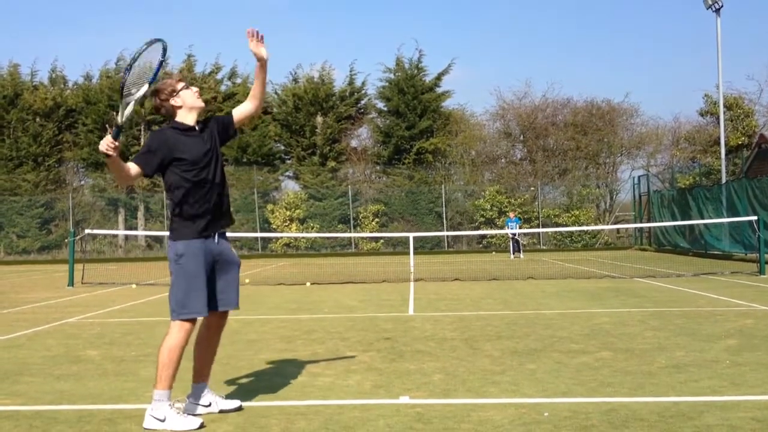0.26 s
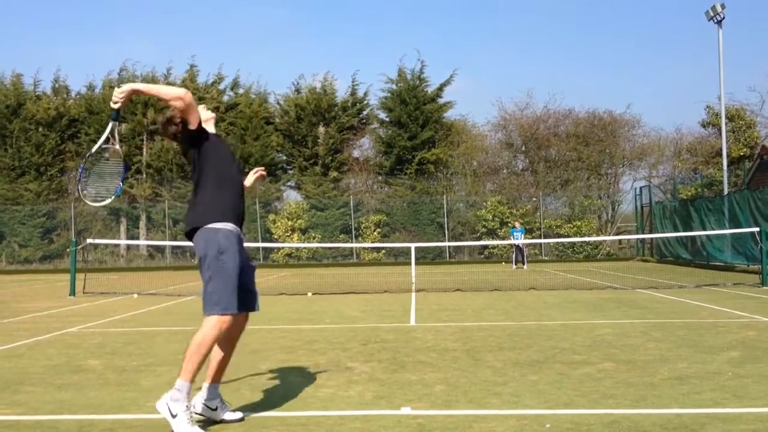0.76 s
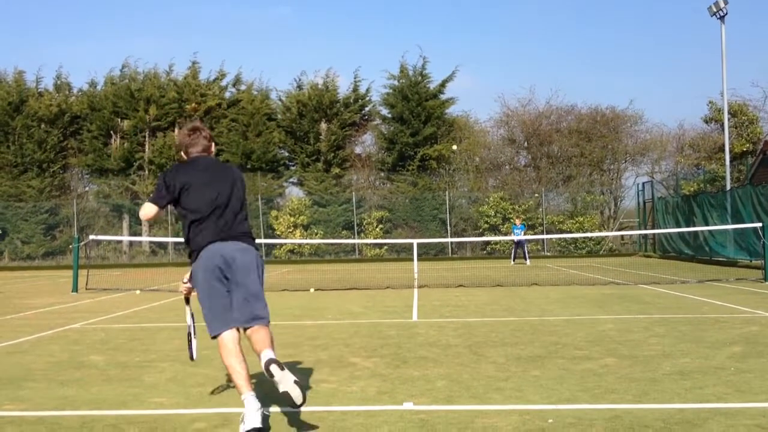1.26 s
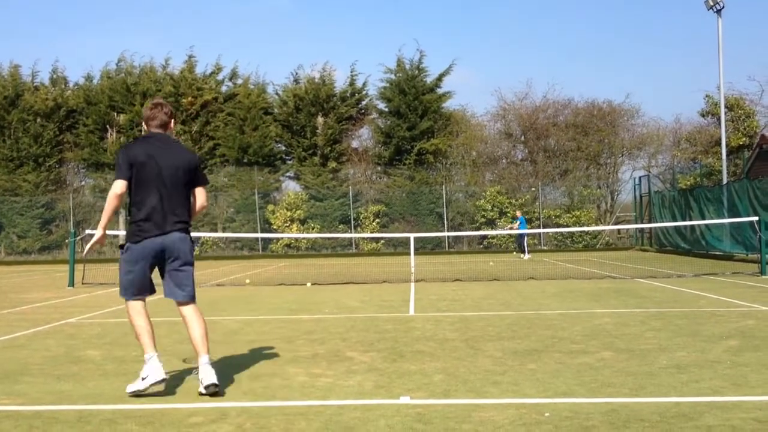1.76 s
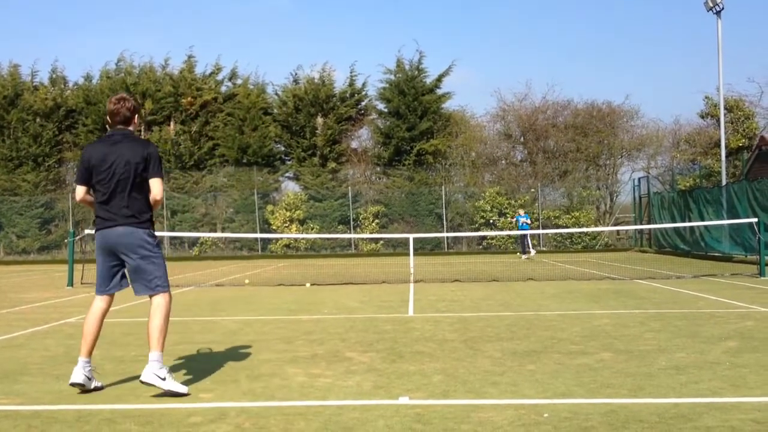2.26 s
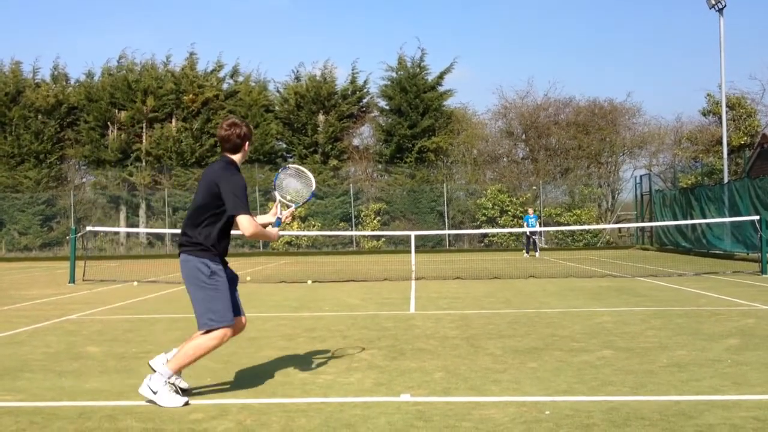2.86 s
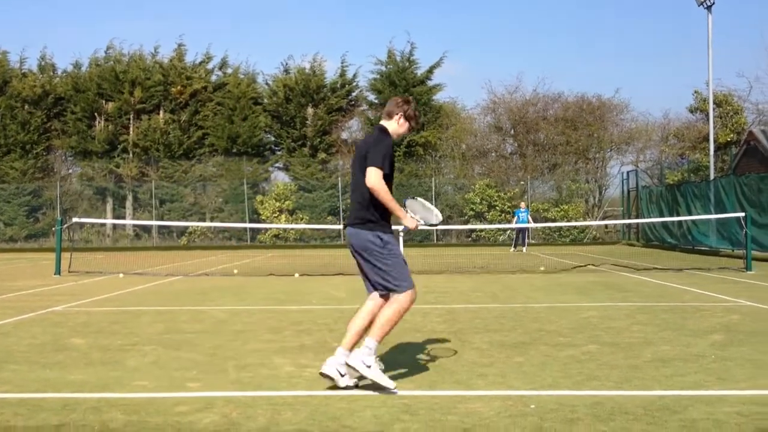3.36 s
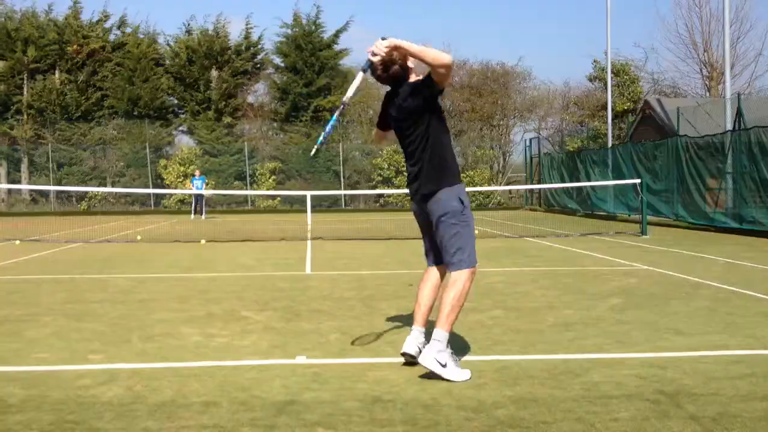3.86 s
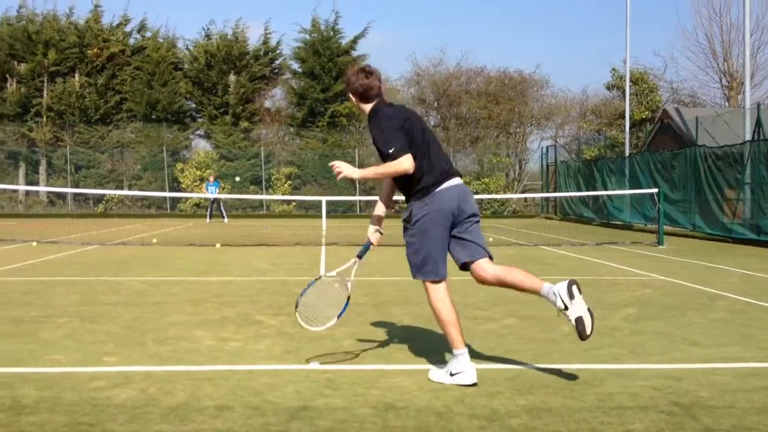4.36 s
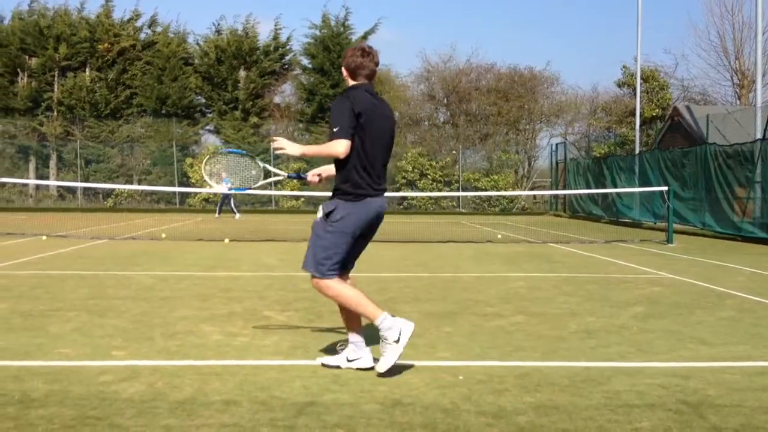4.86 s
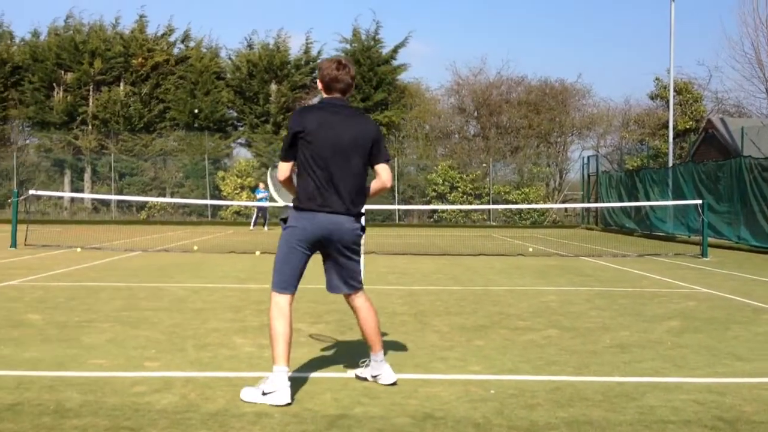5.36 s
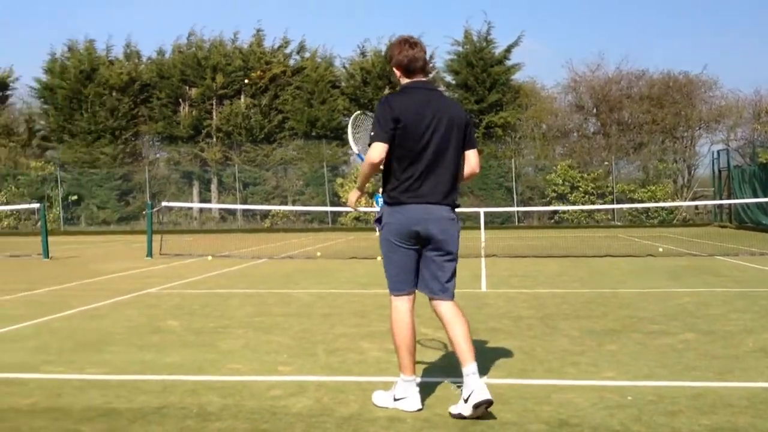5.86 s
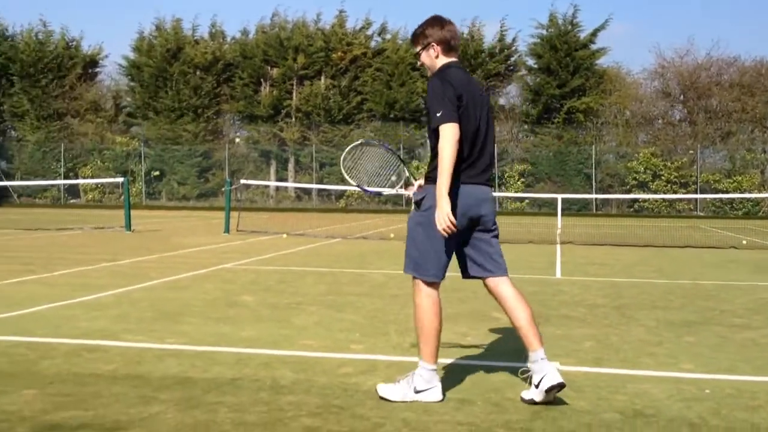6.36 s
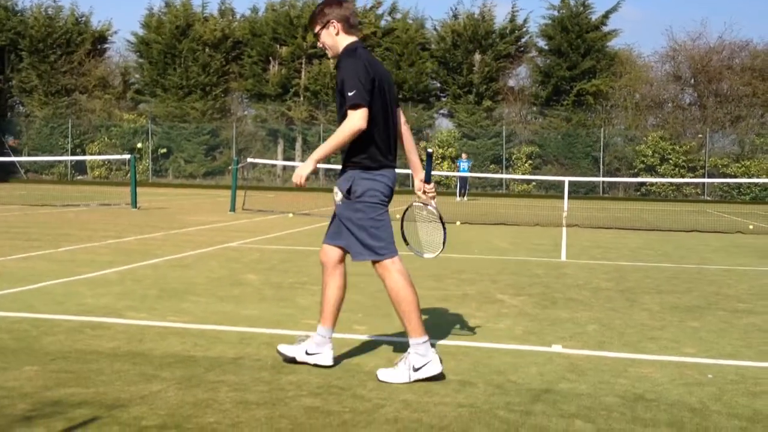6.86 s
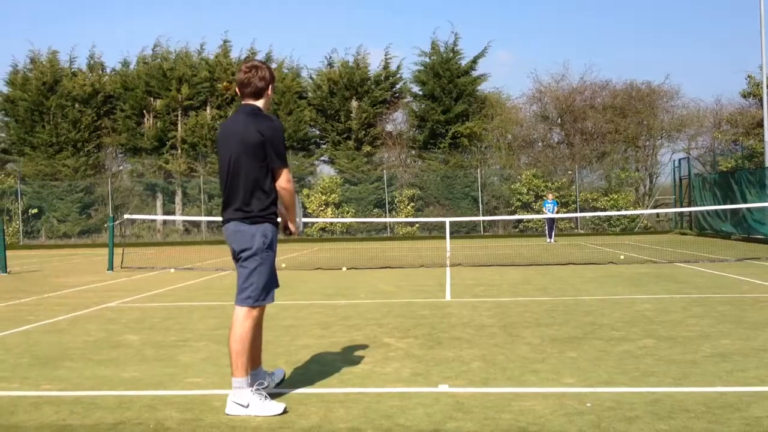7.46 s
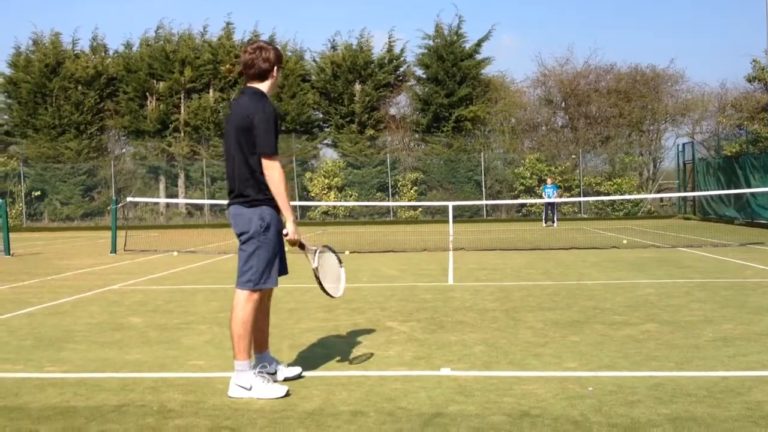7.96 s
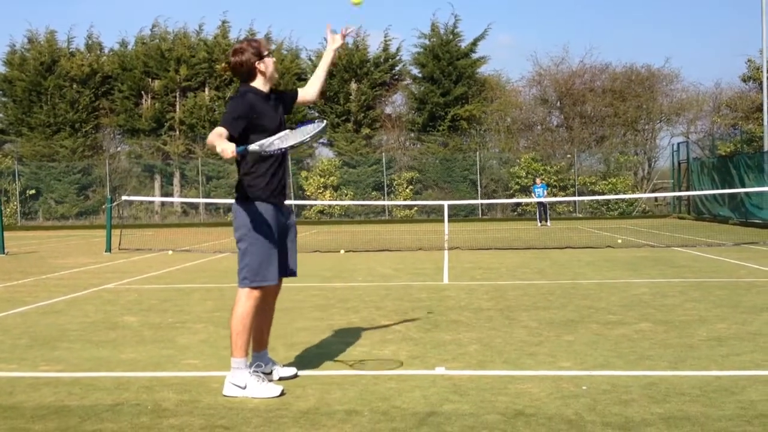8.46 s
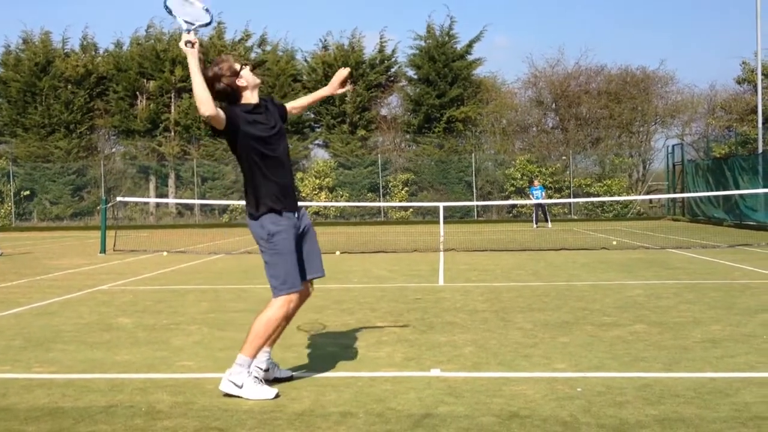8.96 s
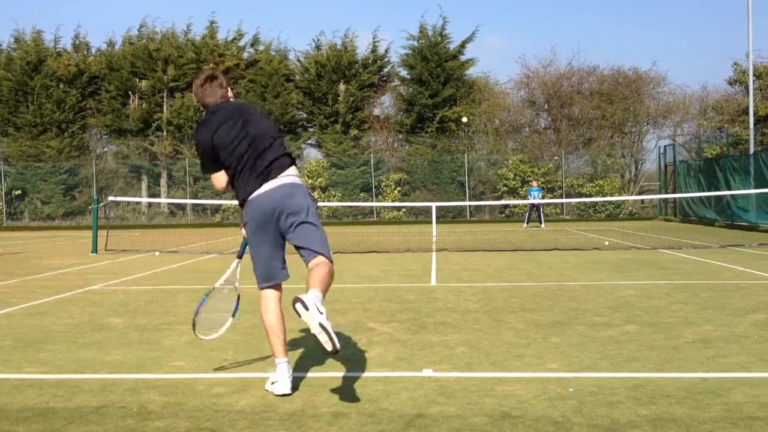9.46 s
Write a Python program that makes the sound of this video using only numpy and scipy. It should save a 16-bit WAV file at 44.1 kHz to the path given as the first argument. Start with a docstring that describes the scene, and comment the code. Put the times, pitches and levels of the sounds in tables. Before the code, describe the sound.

Close, dry tennis serves with a hollow thump, bright crack and brief ring occur three times, the first two answered by faint far knocks. Between them soles scuff and crunch on sandy turf, with tiny ticks. Quiet birds whistle and chirp in trees over low rumble and soft hiss. Open court, nearby microphone, faint echoes off fences and foliage.

```python
"""Serve practice on an outdoor court of sand-filled turf: hard serves close by at 0.9, 4.1 and 9.3 s.
Birds sing from the start: gliding, quivering sines. Shoes land (thump, crunch) and slide (noise) throughout.
The far end returns at 2.3 and 5.0 s, a low hum dies from 3.3 s, the ball bounces at 6.7 s: thump plus noise.
Chips grow louder from 7.2 s; a twitter follows the last serve. Serves are thump, noise and ringing modes.
Under it all lie coloured-noise rumble and hiss; fences and trees throw back faint echoes and a tail."""
import sys
import numpy as np
from scipy import signal
from scipy.fft import rfft, irfft
from scipy.io import wavfile

SR = 44100
rng = np.random.default_rng(int(sys.argv[2]) if len(sys.argv) > 2 else 0)


def wav_record(signal):
    """Record a signal, one row per channel, as 16-bit PCM in the file named by sys.argv[1]."""
    frames = np.transpose(np.atleast_2d(signal))
    bounded = np.clip(frames, -1, 1)
    # unit amplitude maps onto the largest positive 16-bit level
    quanta = np.round(bounded * 32767).astype(np.int16)
    wavfile.write(sys.argv[1], SR, quanta)


N = 428652
TIME = np.arange(N) / SR
AGE = TIME[:SR // 2]  # time since the start of one event, s

# Near serves: t/s, thump level/dB, thump f/Hz, ring level/dB, crack level/dB, snap level/dB, string contact/s
SERVES = [(0.9313, -19, 336, -29.5, -22.5, -8.5, 0.0034), (4.074, -11.5, 339, -12, -20, -18, 0.005),
          (9.3053, -14, 328, -11.5, -21.5, -26, 0.00496)]
# Modes of strings, frame and ball: f/Hz, level/dB, t60/s
RACKET_MODES = [(778, -1.5, .022), (880, -1.5, .015), (1000, -9, .02), (1208, -13, .028), (1326, -14, .026),
                (1507, -18, .035), (1645, -18, .04), (2007, -14, .04), (2403, -15, .024), (2670, -14, .02)]
# Spectrum of felt on strings: f/Hz, level/dB
CRACK_SPECTRUM = [(300, 14), (1000, -2), (1600, 2), (2600, -0.5), (3400, -9), (4000, -6), (4700, 0.5),
                  (5800, -6.5), (8200, -3.5), (10500, -16), (15000, -15)]
# Far ball, two returns and a bounce:
# t/s, thump level/dB, thump f/Hz, crack level/dB, crack top f/Hz, after-rumble level/dB
FAR_KNOCKS = [(2.339, -20.5, 358, -34, 13000, -46), (5.0454, -23.5, 294, -33, 11000, -70),
              (6.6773, -27.5, 273, -32, 1550, -81)]
# Spectrum of the dull rumble after a knock or step: f/Hz, level/dB
SETTLING_SPECTRUM = [(100, -25), (220, 1.5), (370, 5), (500, -2.5), (750, -14.5), (1050, -11),
                     (1500, -16.5), (2050, -19.5), (2800, -20.5), (6000, -23), (15000, -41)]
# Shoes landing: t/s, thump level/dB, thump f/Hz
FOOTFALLS_AT = [(.283, -53, 490), (.554, -49, 480), (0.997, -38.5, 330), (1.858, -41, 303),
                (2.643, -46, 377), (3.406, -45, 274), (3.503, -44.5, 400), (4.155, -37, 290),
                (4.244, -42, 400), (4.648, -41.5, 278), (5.071, -31.5, 340), (5.568, -48, 254),
                (6.738, -47.5, 220), (9.344, -52, 400)]
# Soles sliding on sand: t/s, length/s, end level/dB, swell on the way/dB, tilt/(dB/octave), rasp f/Hz
SLIDES_AT = [(0.799, 0.017, -61.5, 11, 1, 2040), (0.988, 0.076, -41.5, 8, 0.44, 1720),
             (1.342, 0.068, -53.5, 14.5, 3, 2400), (1.397, .014, -45, 20, 0.8, 2150),
             (1.43, 0.088, -46, 3, 1.2, 1900), (1.869, 0.058, -50, -1.5, -2.1, 1990),
             (1.962, .16, -57.5, 7, 0.9, 760), (2.294, 0.013, -54, -1, -3, 1100),
             (2.515, .026, -59, 6, -0.8, 2480), (2.759, 0.013, -55, 4, 1.6, 2500),
             (2.957, 0.14, -40.5, 19, .4, 2050), (3.5, 0.083, -48.5, -1, -0.6, 1860),
             (4.152, 0.033, -45, -1, 1.2, 2100), (4.655, 0.07, -47, 1, -0.2, 1600),
             (5.058, 0.05, -57.5, 0, 1.5, 2100), (5.374, .106, -54.5, 8, -0.1, 786),
             (5.492, .12, -57, 1, 0.5, 940), (5.736, 0.051, -55.5, 4.5, 1.8, 850),
             (6.924, 0.059, -61, 5.5, 0.5, 1320), (9.16, 0.027, -57, 13, 0.2, 1760),
             (9.332, 0.043, -40, 14, -0.2, 1600)]
# Spectrum of sand under a sole: f/Hz, level/dB
SAND_SPECTRUM = [(120, -26), (300, 2), (500, 5), (650, -0.5), (900, 4), (1300, -1.5), (1800, -5),
                 (2600, -5.5), (3800, -11), (6000, -13), (8200, -15), (10500, -22.5), (15000, -26.5)]
# Small sharp ticks: t/s, level/dB, f/Hz
TICKS_AT = [(.699, -52, 5030), (1.123, -54, 8900), (3.735, -46.5, 1960), (6.74, -57, 3500),
            (4.2438, -37.5, 5500), (9.435, -35.5, 6500)]
# Clearest bird notes: t/s, length/s, f/Hz, glide/octave, level/dB
BIRD_NOTES = [(0, 0.29, 8220, .02, -70.5), (.24, 0.29, 7860, -.03, -82), (0, 0.17, 6450, -0.24, -74.5),
              (0.073, .06, 1800, 0.24, -75), (.12, 0.37, 2177, -0.084, -71.5),
              (0.232, 0.35, 5074, .02, -77), (.61, 0.11, 2230, 0.031, -73),
              (2.13, 0.15, 6640, -0.032, -76.5), (2.5, 0.35, 5100, -0.095, -79),
              (3.171, 0.4, 1333, 0.11, -70), (3.583, .23, 8360, .08, -66), (3.638, 0.09, 2050, 0, -74),
              (4.304, 0.24, 2230, 0.24, -70.5), (4.568, 0.061, 1810, -0.03, -68),
              (5.18, .075, 3180, -.06, -70), (7.133, 0.045, 2153, -.07, -63.5),
              (7.134, 0.044, 1830, 0.083, -70), (7.326, 0.25, 1970, 0.0078, -67.5),
              (7.49, .13, 1750, -0.28, -72), (7.756, 0.039, 2170, 0.33, -67),
              (7.996, 0.11, 2574, -0.051, -68.5), (8.103, .24, 2293, 0.12, -69.5),
              (8.278, 0.063, 4270, 0.31, -74.5), (8.449, .12, 2220, -0.43, -70),
              (8.584, 0.132, 1740, 0.19, -71.5), (9.545, 0.103, 7080, 0, -72),
              (9.66, 0.068, 3300, -0.59, -59)]
# Low warbler's phrases of overlapping notes: t/s, length/s, level/dB
WARBLER_PHRASES = [(.35, .29, -75), (4.856, .14, -72.5), (8.46, .07, -72.5)]
# Small bird's run of chips: t/s
CHIP_TIMES_S = [7.2, 7.294, 7.355, 7.42, 7.501, 7.573, 7.667, 7.744]
# Single echoes from ground and fences: delay/s, level/dB
ECHOES_AT = [(.0085, -21.5), (0.04, -20.5), (.105, -56)]
# Tail scattered by trees, per band: f/Hz, level/dB, t60/s
TREE_TAIL = [(151, 3, 0.3), (400, -7.5, 0.69), (1100, -3, 0.7), (2500, -8.5, 0.85), (5500, -6, 0.7),
             (11000, 2.5, 0.25)]
# Background level steps: start t/s, rumble level/dB, air level/dB
BACKGROUND_STEPS = [(0, -62, -68), (1.6, -63.5, -68.5), (3.829, -56.5, -66.5), (7.149, -64.5, -70.5),
                    (8.45, -60.5, -69)]
# Spectrum of the distant rumble: f/Hz, level/dB
RUMBLE_SPECTRUM = [(25, -38), (50, -27), (75, -14), (110, -4), (170, 2.5), (230, -0.5), (330, -9),
                   (450, -21.5), (700, -41), (1500, -78)]
# Spectrum of the air hiss: f/Hz, level/dB
AIR_SPECTRUM = [(100, -5.5), (450, 9.5), (800, 2.5), (1500, 3), (2500, -3), (3500, -5), (4700, -7),
                (7000, -9), (10500, -15), (14500, -11.5)]

GRIT_DB, GRIT_TOP_HZ, SETTLING_DB = -10, 3500, -20  # step crunch and rumble; dB re its thump
RASP_DB = -5  # tread re sand
ARCH_OCTAVES = 0.016  # note ends sit this far below a straight glide
# quiver as a share of pitch: less in high notes, more in wide glides
WARBLE, WARBLE_REF_HZ, WARBLE_FALL_POWER, WARBLE_PER_OCTAVE = 0.012, 2020, 1.7, 0.172
PHRASE_STEP_S, PHRASE_NOTE_S, PHRASE_LOW_HZ, PHRASE_HIGH_HZ = 0.025, 0.063, 1550, 2540
RUN_START_DB, RUN_END_DB = -75, -66
TWITTER_S, TWITTER_LENGTH_S, TWITTER_DB = 9.477, 0.067, -62
TWITTER_HZ, TWITTER_SWING_HZ, TWITTER_SWINGS_PER_S = 6900, 1600, 40
HUM_DB, HUM_STOPS_S, HUM_FADE_S = -70.5, 3.3, 0.13  # far motor
CUTOFF_HZ = 15400


def from_db(db):
    """Decibels to amplitude gain."""
    return 10 ** (np.asarray(db) / 20)


def rms_one(x):
    """Scale to unit power."""
    return x / np.sqrt(np.mean(x ** 2) + 1e-20)


def add(out, s, sound):
    """Mix a sound in at s seconds, kept within the scene."""
    start = int(np.clip(round(s * SR), 0, N - 1))
    out[start:start + len(sound)] += sound[:N - start]


def band(x, low_hz, high_hz, order=2):
    """Causal Butterworth band-pass."""
    edges_hz = [low_hz, min(high_hz, 0.48 * SR)]
    sos = signal.butter(order, edges_hz, "band", fs=SR, output="sos")
    return signal.sosfilt(sos, x + 1e-18)


def white():
    """White noise, one event long."""
    return rng.standard_normal(len(AGE))


def click():
    """Unit impulse, one event long."""
    return 1. * (AGE == 0)


def noise(spectrum, size, tilt_db=0):
    """Coloured noise, rms 1; tilt in dB per octave above the second spectrum point."""
    octave = np.log2(np.maximum(np.fft.rfftfreq(size, 1 / SR), 1))
    hz, db = np.transpose(spectrum)
    colour_db = np.interp(octave, np.log2(hz), db)
    colour_db = colour_db + tilt_db * np.maximum(octave - np.log2(hz[1]), 0)
    return rms_one(irfft(rfft(rng.standard_normal(size)) * from_db(colour_db), size))


def drift(knots_per_s, t):
    """Random wander: straight lines between normal random knots."""
    knots = rng.standard_normal(len(t))
    return np.interp(t * knots_per_s, np.arange(len(t)), knots)


def burst(hold_s, decay_s):
    """Full level during contact, then exponential fall."""
    return np.exp(-np.maximum(AGE - hold_s, 0) / decay_s)


def onset(rise_s):
    """Exponential rise from zero to one."""
    return 1 - np.exp(-AGE / rise_s)


def thump(hz, spread):
    """Air pushed by a soft impact: a few swings around one pitch; peak 1."""
    spread = max(spread, 1.1)
    push = band(click(), hz / spread, hz * spread, order=3)
    return push / np.abs(push).max()


def racket_ring():
    """Strings, frame and ball: decaying sine modes of alternating sign."""
    ring = np.zeros(len(AGE))
    for k, (hz, db, t60_s) in enumerate(RACKET_MODES):
        ring += (-1) ** k * from_db(db - 60 * AGE / t60_s) * np.sin(2 * np.pi * hz * AGE)
    return ring


def serves(ring_rise_s=0.0011, puff_db=-33, buzz_db=-22, buzz_s=0.017, swish_db=-50, swish_s=0.038):
    """The racket swishes, cracks on the ball and flattens it, then rings and buzzes as the ball leaves."""
    out = np.zeros(N)
    ring = racket_ring()
    for s, thump_db, hz, ring_db, crack_db, snap_db, dwell_s in SERVES:
        # the squashed ball thumps and pushes out a deeper puff of air
        squash = thump(hz, spread=1.382) + from_db(puff_db) * thump(80, spread=1.7)
        add(out, s + dwell_s / 4, from_db(thump_db) * squash)

        crack = band(noise(CRACK_SPECTRUM, len(AGE)), 450, 18000) * burst(dwell_s, decay_s=0.0034)
        snap = band(click(), 1000, 11000)
        add(out, s, from_db(crack_db) * crack - from_db(snap_db) * snap)

        # strings slide back over each other
        buzz = from_db(buzz_db) * rms_one(band(white(), 700, 1900, order=1)) * burst(0, buzz_s)
        ringing = band((ring + buzz) * onset(ring_rise_s), 220, 16000)
        add(out, s + dwell_s / 2, from_db(ring_db) * ringing)

        # racket head is fastest, and the swish loudest, at the ball
        speed = np.exp(-np.abs(AGE - AGE.mean()) / swish_s)
        swish = speed * noise(SAND_SPECTRUM, len(AGE), tilt_db=1.7)
        add(out, s - AGE.mean(), from_db(swish_db) * swish)
    return out


def impact(thump_db, hz, grit_db, top_hz, settling_db, settle_s=0.095, grit_s=0.0042, thump_lag_s=0.00025):
    """A short crunch, a thump, and a dull rumble that dies away after it."""
    grit = band(noise(CRACK_SPECTRUM, len(AGE)), 670, max(top_hz, 900), order=4)
    grit = grit * burst(hold_s=0.0013, decay_s=grit_s)
    settling = noise(SETTLING_SPECTRUM, len(AGE)) * burst(hold_s=0.019, decay_s=settle_s) * onset(0.0019)
    push = np.interp(AGE - thump_lag_s, AGE, thump(hz, spread=1.386), left=0)
    return from_db(grit_db) * grit + from_db(thump_db) * push + from_db(settling_db) * settling


def knocks():
    """The ball meets the far racket or the turf."""
    out = np.zeros(N)
    for s, thump_db, hz, crack_db, top_hz, rumble_db in FAR_KNOCKS:
        add(out, s, impact(thump_db, hz, crack_db, top_hz, rumble_db))
    return out


def footfalls():
    """The harder a shoe lands, the more the sand crunches and the turf rumbles."""
    out = np.zeros(N)
    for s, db, hz in FOOTFALLS_AT:
        add(out, s, impact(db, hz, db + GRIT_DB, GRIT_TOP_HZ, db + SETTLING_DB))
    return out


def slides(grain_db=1.64, grip_db=1.54, bite_s=0.0035, stop_s=0.014, rasp_width_hz=700):
    """Soles drag over sand grains as weight shifts, gripping unevenly; the tread rasps around one pitch."""
    out = np.zeros(N)
    for s, length_s, db, swell_db, tilt_db, rasp_hz in SLIDES_AT:
        level_db = np.interp(AGE, [0, length_s], [db - swell_db, db])
        level_db = level_db + grip_db * drift(91.6, AGE)
        contact = onset(bite_s) * burst(length_s, stop_s)
        grains = from_db(grain_db * drift(607.4, AGE))
        sand = rms_one(noise(SAND_SPECTRUM, len(AGE), tilt_db) * grains)
        low_hz = max(rasp_hz - rasp_width_hz / 2, 100)
        rasp = rms_one(band(white(), low_hz, rasp_hz + rasp_width_hz / 2))
        add(out, s, from_db(level_db) * contact * (sand + from_db(RASP_DB) * rasp))
    return out


def ticks(decay_s=0.00089):
    """Tiny hard clicks: decaying noise, each around its own pitch."""
    out = np.zeros(N)
    for s, db, hz in TICKS_AT:
        tick = rms_one(band(white(), hz / 1.6, hz * 1.12, order=1)) * burst(0, decay_s)
        add(out, s, from_db(db) * tick)
    return out


def whistle(length_s, pitches_hz, warble):
    """The syrinx gives a nearly pure tone: a sine through three pitches, quivering in pitch and level."""
    t = TIME[:int(length_s * SR)]
    glide_hz = np.polyval(np.polyfit([0, 0.5, 1], pitches_hz, 2), t / length_s)
    hz = glide_hz * (1 + warble * drift(527, t))
    swell = signal.windows.tukey(len(t), 0.5) * from_db(2.7 * drift(47.0, t))
    return np.sqrt(2) * swell * np.sin(2 * np.pi * np.cumsum(hz) / SR)


def slur(length_s, hz, glide_octaves):
    """An arched note gliding through its pitch; low notes and wide glides quiver most."""
    half = glide_octaves / 2
    pitches_hz = hz * 2 ** np.array([-half - ARCH_OCTAVES, 0, half - ARCH_OCTAVES])
    warble = WARBLE * (WARBLE_REF_HZ / hz) ** WARBLE_FALL_POWER
    warble += WARBLE_PER_OCTAVE * abs(glide_octaves) * WARBLE_REF_HZ / hz
    return whistle(length_s, pitches_hz, warble)


def chips():
    """A run of short falling whistles in a steady crescendo."""
    out = np.zeros(N)
    for s, db in zip(CHIP_TIMES_S, np.linspace(RUN_START_DB, RUN_END_DB, len(CHIP_TIMES_S))):
        add(out, s, from_db(db) * whistle(0.028, [3950, 3550, 3150], warble=0.0054))
    return out


def twitter():
    """A thin sine whose pitch swings quickly up and down, fading in and out."""
    t = TIME[:int(TWITTER_LENGTH_S * SR)]
    hz = TWITTER_HZ - TWITTER_SWING_HZ * np.cos(2 * np.pi * TWITTER_SWINGS_PER_S * t)
    return np.sqrt(2) * signal.windows.tukey(len(t), 0.5) * np.sin(2 * np.pi * np.cumsum(hz) / SR)


def birds(phrase_glide_octaves=0.396):
    """Whistled notes, warbled phrases, a twitter and a run of chips from the trees."""
    out = chips()
    add(out, TWITTER_S, from_db(TWITTER_DB) * twitter())
    for s, length_s, hz, glide_octaves, db in BIRD_NOTES:
        add(out, s, from_db(db) * slur(length_s, hz, glide_octaves))
    for s, length_s, db in WARBLER_PHRASES:
        for start_s in np.arange(s, s + length_s, PHRASE_STEP_S):
            hz = rng.uniform(PHRASE_LOW_HZ, PHRASE_HIGH_HZ)
            glide_octaves = phrase_glide_octaves * rng.uniform(-1.02, 1)
            add(out, start_s, from_db(db) * slur(PHRASE_NOTE_S, hz, glide_octaves))
    return out


def chorus(count=36, level_db=-78):
    """Farther birds: faint short slurs at random times and pitches."""
    out = np.zeros(N)
    for when, span, height, slope in rng.random((count, 4)):
        hz = 1600 * 3 ** height
        glide = 1 + 0.2 * (slope - 0.5) * np.array([-1, 0, 1])
        note = whistle(0.06 + 0.18 * span, hz * glide, warble=0.026)
        add(out, when * N / SR, from_db(level_db) * note)
    return out


def fences(x):
    """A few single reflections without bass or top."""
    out = np.zeros(N)
    dull = band(x, 350, 5000, order=1)
    for delay_s, db in ECHOES_AT:
        add(out, delay_s, from_db(db) * dull)
    return out


def trees(x, build_s=0.004):
    """Leaves and trunks scatter sound into a thin noise tail that dies band by band."""
    tail = np.zeros(len(AGE))
    for hz, db, t60_s in TREE_TAIL:
        tail += from_db(db - 60 * AGE / t60_s) * band(white(), hz / 1.58, hz * 1.52)
    response = tail * onset(build_s) / np.sqrt(len(AGE) / 20)
    return signal.fftconvolve(x, response)[:N]


def background(hum_hz=105):
    """Distant rumble and soft air hiss, stepping and wandering in level, with a wavering low hum."""
    starts_s, rumble_db, air_db = np.transpose(BACKGROUND_STEPS)
    step = np.searchsorted(starts_s[1:], TIME)
    rumble = from_db(rumble_db[step] + 0.82 * drift(9.8, TIME)) * noise(RUMBLE_SPECTRUM, N)
    air = from_db(air_db[step] + 0.5 * drift(2.5, TIME)) * noise(AIR_SPECTRUM, N)
    running = np.exp(-np.maximum(TIME - HUM_STOPS_S, 0) / HUM_FADE_S)
    wavering_hz = hum_hz + 2.1 * drift(8.4, TIME)
    tone = rms_one(np.sin(2 * np.pi * np.cumsum(wavering_hz) / SR))
    return rumble + air + from_db(HUM_DB) * running * tone


def scene():
    """Play is close and dry, birds far and diffuse."""
    play = serves() + knocks() + footfalls() + slides() + ticks()
    song = birds()
    near = play + fences(play) + from_db(-14) * trees(play)
    far = from_db(-1.5) * song + from_db(-2.5) * trees(song + chorus())
    return (near + far + background())[None]


def record(dry):
    """Steep elliptic low-pass: little is left above the cutoff."""
    sos = signal.ellip(12, 0.1, 70, CUTOFF_HZ, fs=SR, output="sos")
    return signal.sosfilt(sos, dry)


dry = scene()
out = record(dry)
wav_record(out)
```